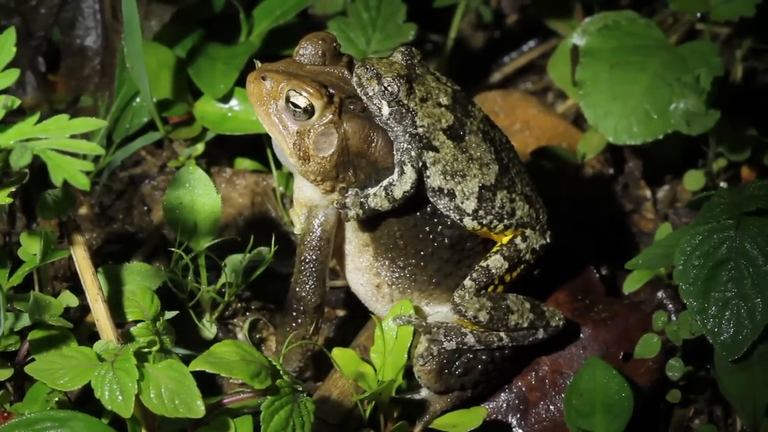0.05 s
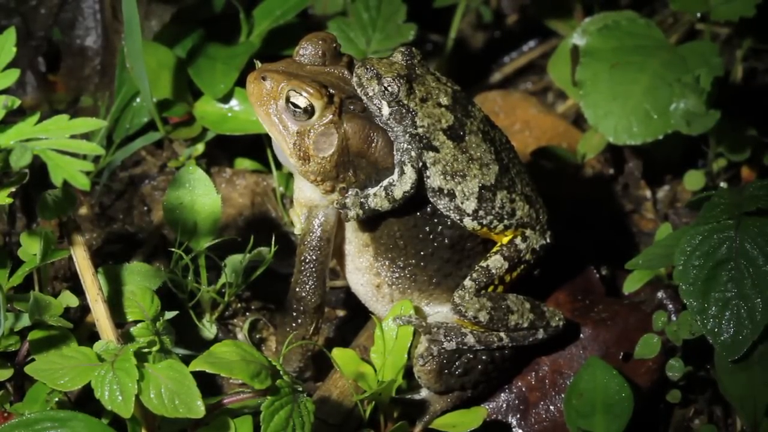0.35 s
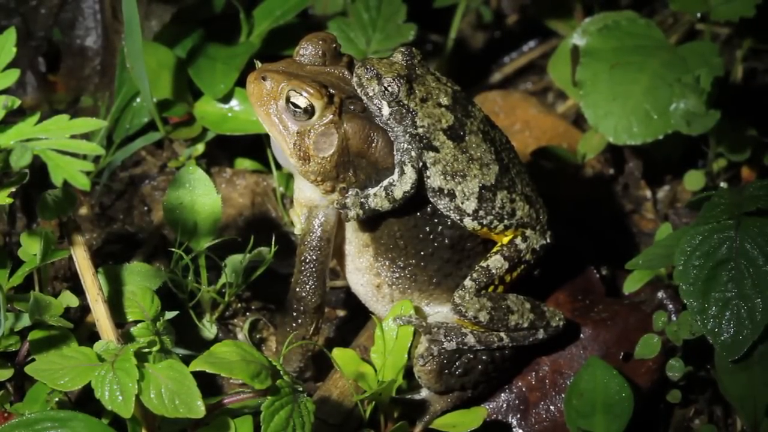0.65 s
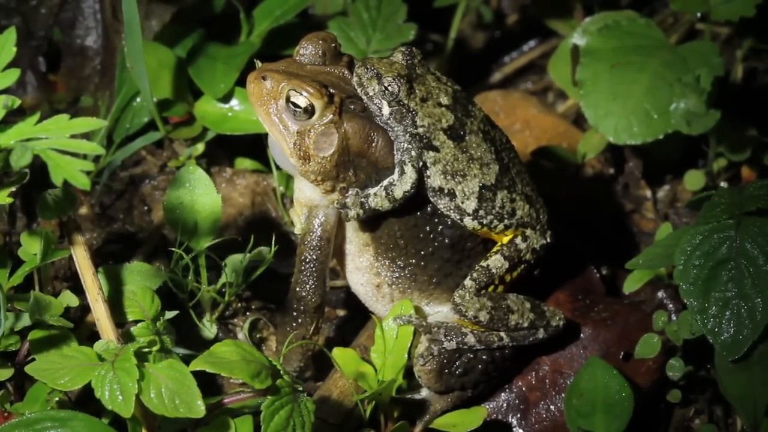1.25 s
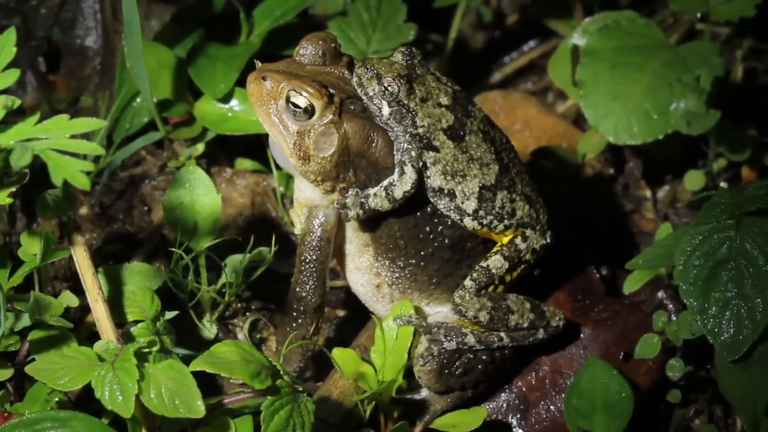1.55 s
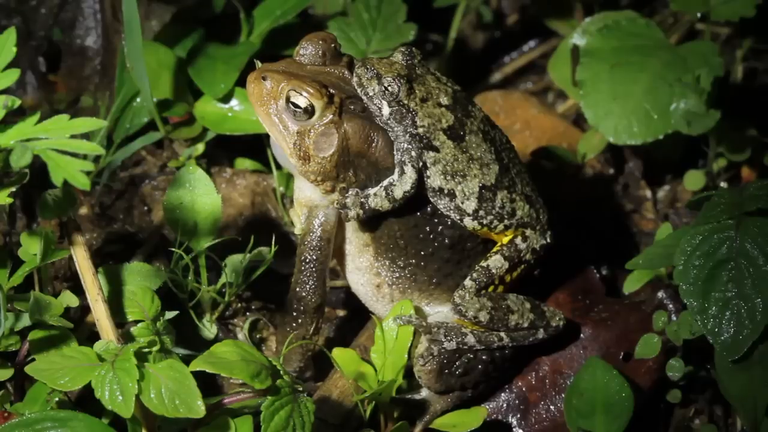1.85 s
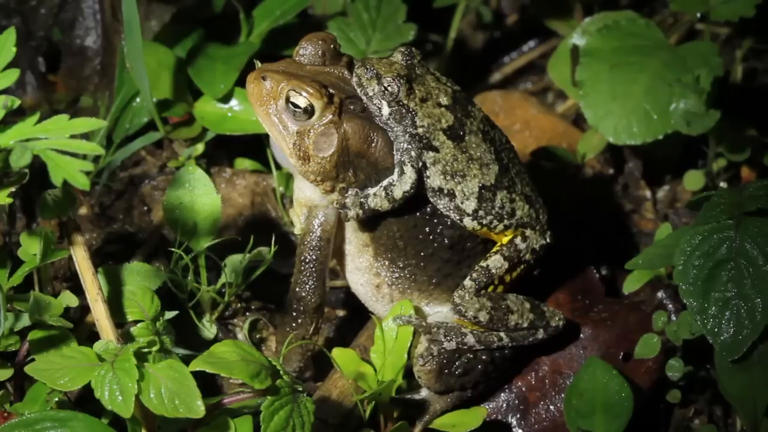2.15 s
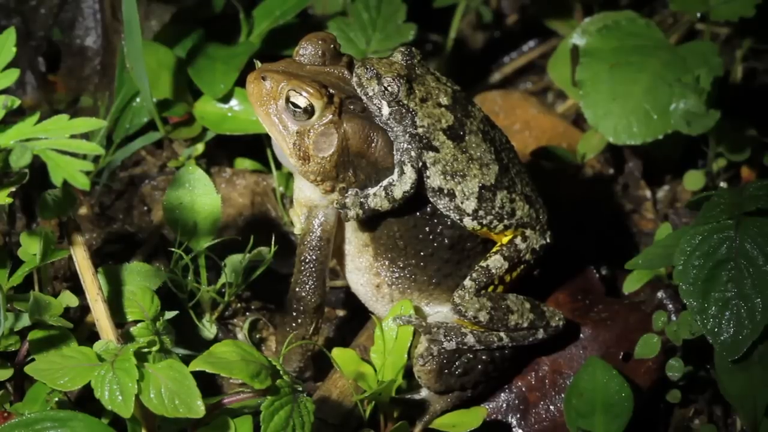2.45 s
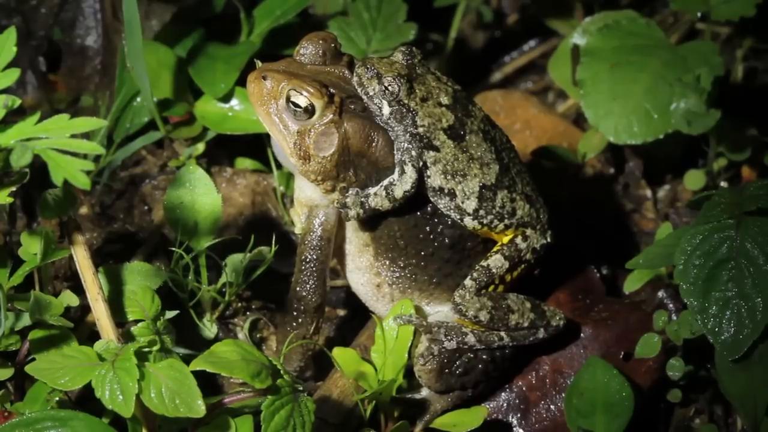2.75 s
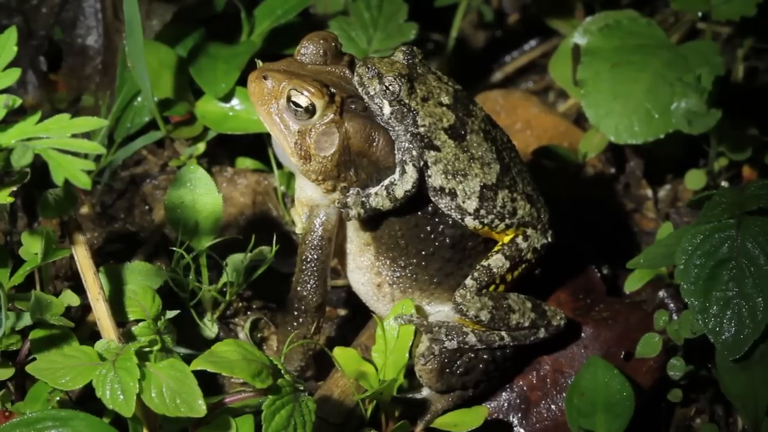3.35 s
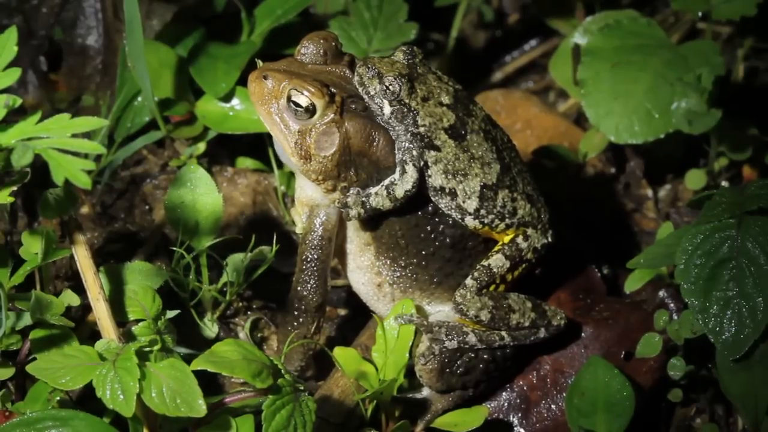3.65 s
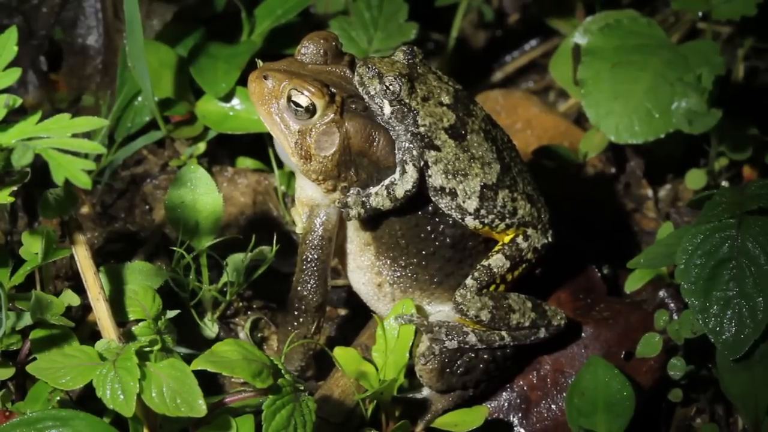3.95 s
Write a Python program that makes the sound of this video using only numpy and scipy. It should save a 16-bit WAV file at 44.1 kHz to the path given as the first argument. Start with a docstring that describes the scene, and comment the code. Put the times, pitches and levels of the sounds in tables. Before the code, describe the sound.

Toads trill throughout in high, overlapping, pulsing tones, echoing in woods at night. A whip-poor-will's gliding whistle peaks at about 0.5, 1.6, 2.8 and 4 seconds. Treefrogs add short rattling trills, loudest from 2.4 to 3.4 seconds. Crickets chirp quickly all along, and small frogs peep faintly far off. Tiny dry ticks sound close by, over a soft murmur of distant frogs and night air.

```python
"""Toads hold long overlapping trills at a wooded pond at night, pulsed tones so close in pitch they beat.
Treefrogs rattle through resonant throats, a whip-poor-will repeats its gliding whistle, two crickets
chirp with their wings and small frogs peep far off. Reverberation among the trunks smears these calls.
Dry ticks and one faint rustle sound close by, over the murmur of a far chorus and the night air."""
import sys
import numpy as np
from scipy import signal
from scipy.fft import rfft, irfft
from scipy.io import wavfile
from scipy.ndimage import uniform_filter1d

SR = 44100
rng = np.random.default_rng(int(sys.argv[2]) if len(sys.argv) > 2 else 0)


def put_to_file(sound):
    """Save the sound as 16-bit audio at rate SR, in the file named by the first command-line argument."""
    columns = np.atleast_2d(sound).T  # one column per channel
    safe = np.clip(columns, -1, 1)
    whole_steps = np.round(safe * 32767)
    wavfile.write(sys.argv[1], SR, whole_steps.astype(np.int16))


N = 176400
T = np.arange(N) / SR
HZ = np.fft.rfftfreq(N, 1 / SR)


def undb(db):
    """Amplitude ratio of a level in decibels."""
    return 10 ** (np.asarray(db) / 20)


def unit(x):
    """Normalisation to an rms of 1."""
    return x / np.sqrt(np.mean(x ** 2) + 1e-18)


def walk(cutoff_hz):
    """Random fluctuation: low-passed noise with an rms of 1."""
    lowpass = np.exp(-np.minimum(HZ / cutoff_hz, 20) ** 2)
    return unit(irfft(rfft(rng.standard_normal(N)) * lowpass, N))


def resonate(x, hz, width, order=1):
    """Band-pass resonance; each order adds an identical stage and narrows the band."""
    return irfft(rfft(x) / (1 + 1j * (HZ ** 2 - hz ** 2) / (np.maximum(HZ, 1) * width)) ** order, N)


def noise_band(hz, width):
    """Resonant filtering of white noise, at an rms of 1."""
    return unit(resonate(rng.standard_normal(N), hz, width, order=2))


def wood(x, wet_db, early_s=0.045, late_db=-3.5, t60_s=1.9):
    """Reverberation: quick scatter from ground and trunks, then a long exponential tail."""
    t = T[:N // 3]
    decay = np.exp(-t / early_s) + undb(late_db) * np.exp(-np.log(1000) * t / t60_s)
    response = unit(rng.standard_normal(len(t)) * decay) / np.sqrt(len(t))
    lead_in = np.concatenate([x[len(t) - 1:0:-1], x])  # the wood is already ringing at the start
    wet = signal.fftconvolve(lead_in, response, "valid")
    return (x + undb(wet_db) * wet) / np.hypot(1, undb(wet_db))


def pulsing(rate, duty, unsteady=0.01135):
    """Amplitude modulation by a vocal sac: rounded pulses, and the place within each (-.5 to .5)."""
    cycle = (np.cumsum(rate * (1 + unsteady * walk(3.02))) / SR + rng.random()) % 1
    place = np.minimum(cycle / duty, 1) - .5
    return np.cos(np.pi * place), place


def turn(hz):
    """Phase as the time integral of frequency."""
    return 2 * np.pi * np.cumsum(hz) / SR


def toads(depth=0.99, drift_hz=1.98, swell_db=1.5):
    """Beating: nearly pure pulsed tones of close pitch interfere; their sum also wavers in level."""
    # Each row: pitch in Hz, pulses per second, level in dB.
    trills = [(1826, 25.5, -43.5), (1837, 40, -45), (1871, 29.5, -50.5), (1659, 34, -58.5),
              (1740, 70, -60.5)]
    out = 0
    for hz, rate, db in trills:
        pulse, _ = pulsing(rate, duty=0.94)
        throb = 1 - depth * (1 - pulse)
        voice = throb * np.sin(turn(hz + drift_hz * walk(2.884)))
        out += undb(db) * unit(wood(voice, wet_db=-6))
    return out * undb(swell_db * walk(7.5))


def treefrogs(sweep_hz=439, rough_hz=27.48, fade_s=0.18):
    """Source and filter: short, rough, rising pulses in a throat that favours the second harmonic."""
    # Each row: start and end in seconds, pitch in Hz, pulses per second, level in dB.
    trills = [(-.2, 0.51, 1187, 38, -72), (0.557, 1.37, 1149, 32, -57), (1.53, 2.24, 1133, 25.6, -54),
              (2.365, 3.43, 1185, 33.6, -44.5), (3.294, 4.2, 1165, 42, -59)]
    # Throat resonances for harmonics 1 to 3. Each row: centre and width in Hz, gain in dB.
    throat = [(1320, 660, -6), (2285, 280, 3.5), (3460, 510, -18.5)]
    out = 0
    for start, end, hz, rate, db in trills:
        pulse, place = pulsing(rate, duty=.6)
        phase = turn(hz + sweep_hz * place + rough_hz * walk(58.5))
        voice = sum(undb(gain_db) * resonate(pulse * np.sin(k * phase), centre, width, order=2)
                    for k, (centre, width, gain_db) in enumerate(throat, 1))
        fade = np.clip(np.minimum(T - start, end - T) / fade_s, 0, 1)
        out += undb(db) * unit(voice) * fade
    return wood(out, wet_db=2.5)


def far_chorus(throb_db=1):
    """Incoherent addition: many distant voices merge into throbbing bands of noise."""
    # Each row: centre and nominal width in Hz, level in dB, throb cutoff in Hz.
    bands = [(417.2, 33.4, -65.5, 9.3), (724.6, 63, -61, 21), (808, 34, -71.5, 12), (2120, 106, -57, 40),
             (2203, 100, -57, 19), (2488, 52, -71.5, 30), (2930, 140, -65.5, 39)]
    return sum(undb(db) * unit(noise_band(hz, 1.42 * width) * undb(throb_db * walk(throb_hz)))
               for hz, width, db, throb_hz in bands)


def air(level_db=-52):
    """Broadband noise floor: the smooth murmur of night air, and microphone hiss."""
    # Each row: frequency in Hz, relative spectral density in dB.
    spectrum = [(20, -17), (45, -8), (75, 1.5), (120, 0.5), (190, -3.5), (330, 0), (520, 3.5), (680, -0.5),
                (930, -3.5), (1200, 7), (1650, 1.5), (2300, 7.5), (2700, -1.5), (3600, -4), (5000, -10),
                (8000, -13), (12500, -14.5), (15700, -20)]
    hz, db = np.array(spectrum).T
    colour = undb(np.interp(np.log(HZ + 1), np.log(hz), db))
    return undb(level_db) * unit(irfft(rfft(rng.standard_normal(N)) * colour, N))


def whistle(phrase, at, quaver=0.0112):
    """Frequency modulation: a pure, slightly quavering tone follows the contour of one phrase."""
    times, hz, db = np.array(phrase).T
    pitch = uniform_filter1d(np.interp(T - at, times, hz), size=300) * (1 + quaver * walk(122))
    envelope = uniform_filter1d(np.interp(T - at, times, undb(db), left=0, right=0), size=200)
    return envelope * np.sin(turn(pitch))


def whippoorwill():
    """Pitch glides in three phrases: a short arch, a low slur and a whip up to the top note."""
    # Each row: time of the top note in seconds, level in dB, relative gain of the slur in dB.
    calls = [(.535, -35.5, -25), (1.603, -34, -21.5), (2.833, -34.5, -23), (4.015, -35, -28)]
    # Phrase contours. Each row: seconds from the top note, pitch in Hz, relative level in dB.
    whip = [(-.55, 1283, -26), (-.525, 1448, -9.5), (-.497, 1640, -4.5), (-.474, 1657, -1.5),
            (-.455, 1500, -10), (-.443, 1410, -38)]
    poor = [(-.24, 1170, 7), (-.205, 1218, -12), (-.172, 1410, 10.5), (-.13, 1370, 6), (-.095, 1400, 0)]
    will = [(-.11, 1368, -16), (-.068, 1510, -6.5), (-.04, 1775, -4), (-.018, 2066, 0.5),
            (-.006, 2448, -1.5), (.005, 2466, -4), (.02, 1930, -5), (.06, 1640, -7.5), (.08, 1486, -26)]
    out = 0
    for at, db, slur_db in calls:
        out += undb(db) * (whistle(whip, at) + undb(slur_db) * whistle(poor, at) + whistle(will, at))
    return wood(out, wet_db=-2.5)


def glide(at, length_s, hz, rise_hz):
    """Linear frequency sweep: one rounded note, centred on the given time and pitch."""
    out, place = np.zeros(N), (T - at) / length_s
    on = np.abs(place) < .5
    out[on] = np.cos(np.pi * place[on]) ** 2 * np.sin(turn(hz + rise_hz * place[on]))
    return out


def cricket(chirps, hz, fall_hz, pulse_s, period_s, wet_db, scatter_db=-0.1, scatter_hz=30):
    """Stridulation: each wing stroke is a short tone that falls as the wing slows."""
    out = 0
    for at, pulses, db in chirps:
        for k, (size, detune) in enumerate(rng.standard_normal((pulses, 2))):
            stroke = glide(at + k * period_s, pulse_s, hz + scatter_hz * detune, -fall_hz)
            out += undb(db + scatter_db * size) * stroke
    return wood(out, wet_db)


def crickets():
    """Two stridulating crickets: the near one's note falls steeply, the other's is almost level."""
    # Each row: centre of a chirp's first pulse in seconds, number of pulses, level in dB.
    near_chirps = [(.008, 2, -51.5), (.494, 5, -51.5), (.67, 3, -49.5), (.776, 6, -51.5), (.992, 4, -49.5),
                   (1.121, 5, -50.5), (1.301, 5, -51.5), (1.488, 4, -51.5), (1.634, 3, -50),
                   (1.754, 4, -50), (1.903, 4, -51.5), (2.044, 4, -50.5), (2.246, 5, -51.5),
                   (2.46, 4, -49.5), (2.616, 4, -50.5), (2.761, 3, -51), (2.892, 4, -51.5),
                   (3.088, 4, -49.5), (3.22, 5, -50), (3.623, 6, -51), (3.827, 3, -49.5), (3.93, 3, -50)]
    second_chirps = [(.88, 2, -48.5), (1.192, 3, -46.5), (1.52, 3, -46), (1.837, 3, -47.5),
                     (2.171, 3, -45.5), (2.483, 3, -48), (2.89, 3, -47.5), (3.285, 3, -48)]
    near = cricket(near_chirps, hz=4274, fall_hz=757, pulse_s=.019, period_s=.0315, wet_db=-6)
    second = cricket(second_chirps, hz=4155, fall_hz=131, pulse_s=.023, period_s=.0335, wet_db=-5)
    return near + second


def ticks(decay_s=0.0015, crack_db=-7.5):
    """Damped resonance: tiny dry scrapes ring high and die within milliseconds."""
    # Each row: start in seconds, level in dB, extra gain of the lowest mode in dB.
    scrapes = [(0.1483, -54, 6), (0.38, -59, -5), (1.137, -50, 2.5), (1.245, -52, 2), (1.3578, -53.5, 5.5),
               (1.4218, -56, 7), (1.6167, -58, -12), (1.6397, -52.5, 6.5), (1.8161, -55.5, 7),
               (1.9335, -56, -10), (2.139, -54.5, 9), (2.235, -54, -10), (2.552, -51.5, -20),
               (2.9876, -56, -12), (3.1177, -55.5, 8.5)]
    # Each row: centre and width in Hz, relative level in dB.
    modes = [(6970, 880, -8.5), (9650, 500, -7.5), (11700, 2200, -5)]
    low, *upper = [undb(db) * noise_band(hz, width) for hz, width, db in modes]
    high = sum(upper) + undb(crack_db) * noise_band(hz=8500, width=8000)
    out = 0
    for at, db, low_db in scrapes:
        age = np.clip((T - at) / decay_s, 0, 20)
        envelope = np.sqrt(age) * np.exp(1 - age)
        out += undb(db) * envelope * (high + undb(low_db) * low)
    return out


def peepers():
    """Upward frequency sweeps: small frogs far off, one whistle at a time."""
    # Each row: centre in seconds, level in dB.
    peeps = [(.58, -68), (1.23, -60), (2.08, -60), (2.72, -60), (3.68, -60)]
    whistles = sum(undb(db) * glide(at, length_s=0.3, hz=2890, rise_hz=328) for at, db in peeps)
    return wood(whistles, wet_db=-3)


def rustle(peak_s=3.48, spread_s=.2, level_db=-66):
    """Band-limited noise: a faint high hiss swells and fades under a Gaussian envelope."""
    envelope = np.exp(-((T - peak_s) / spread_s) ** 2)
    return undb(level_db) * noise_band(hz=12000, width=11000) * envelope


def scene():
    """Superposition: all the voices around the pond add at one microphone."""
    voices = crickets() + toads() + treefrogs() + peepers() + whippoorwill()
    return (voices + ticks() + far_chorus() + air() + rustle())[None]


def record(dry, top_hz=15750):
    """Band limiting: the recorder's steep low-pass filter cuts the highest treble."""
    return signal.sosfilt(signal.ellip(12, .1, 80, top_hz, fs=SR, output="sos"), dry)


dry = scene()
out = record(dry)
put_to_file(out)
```